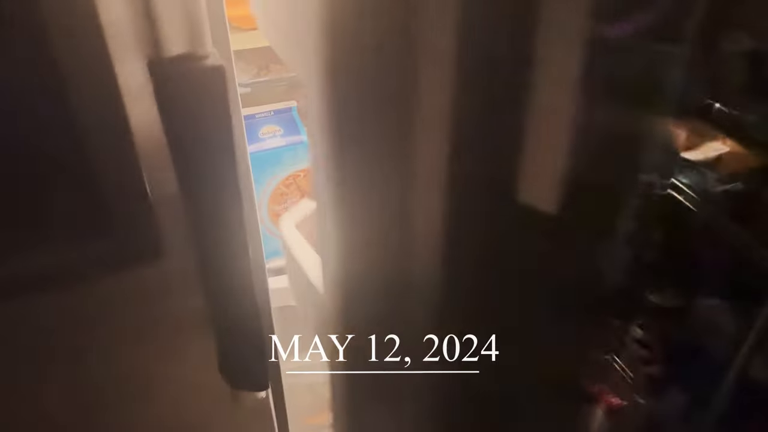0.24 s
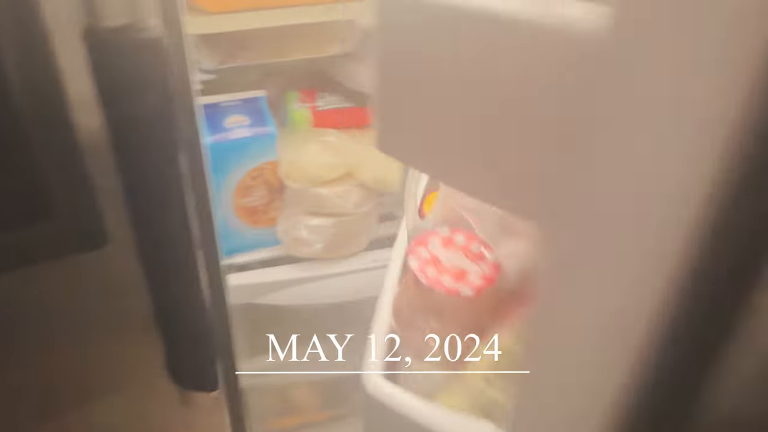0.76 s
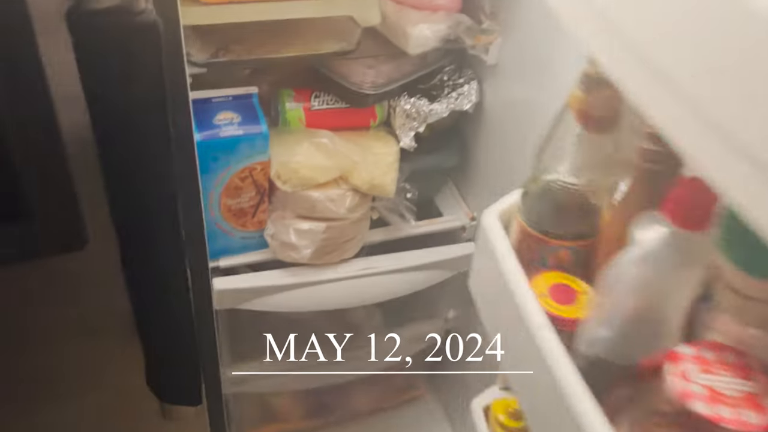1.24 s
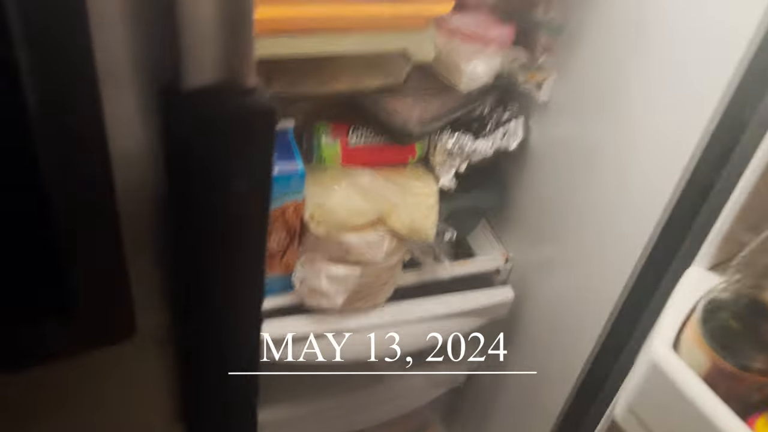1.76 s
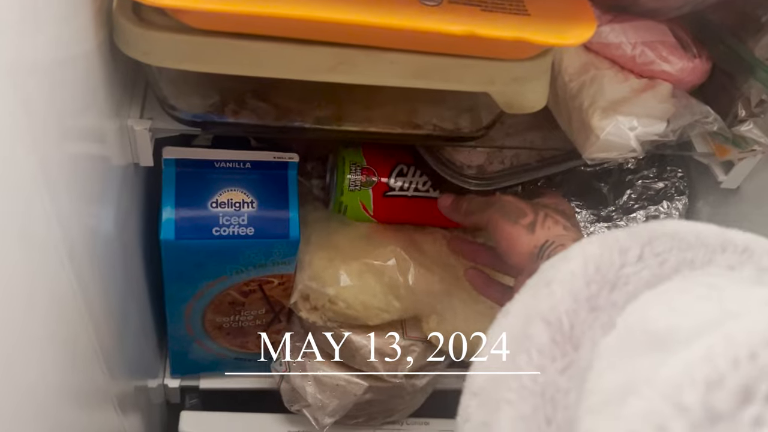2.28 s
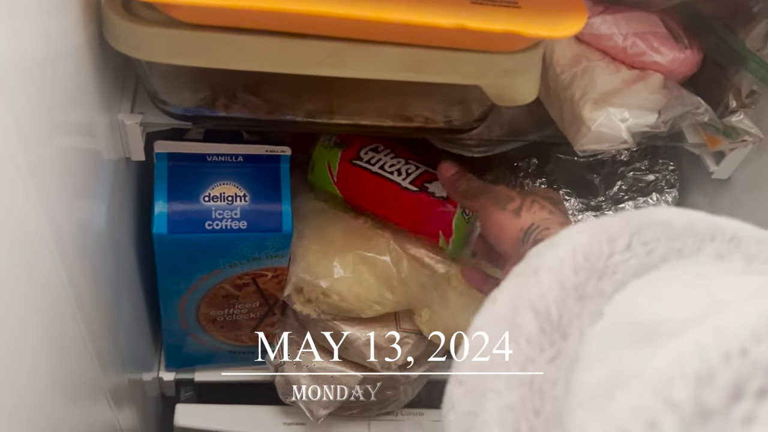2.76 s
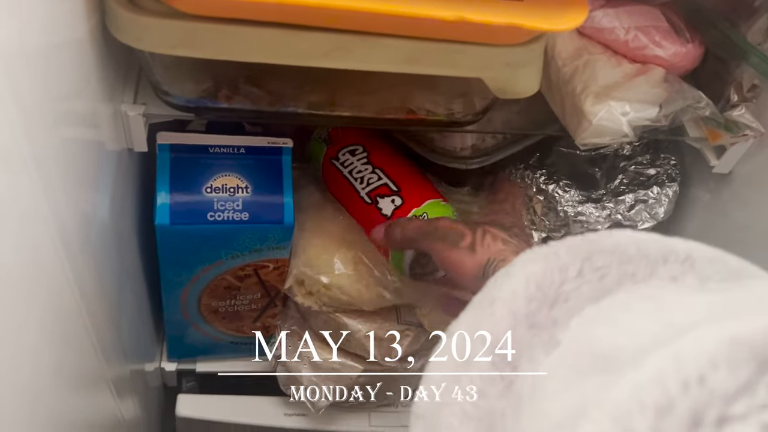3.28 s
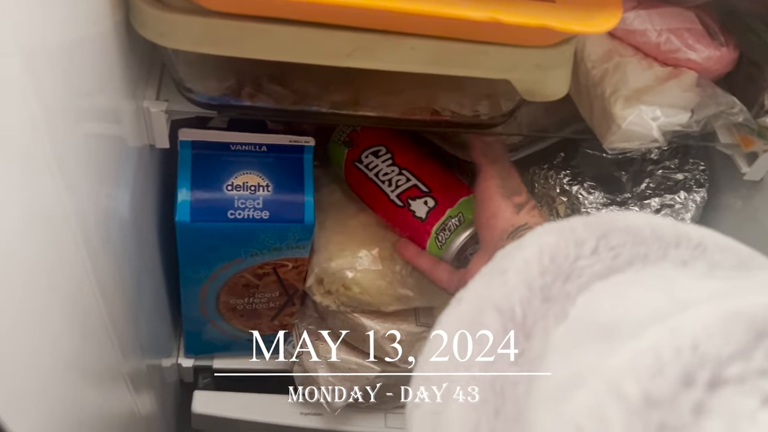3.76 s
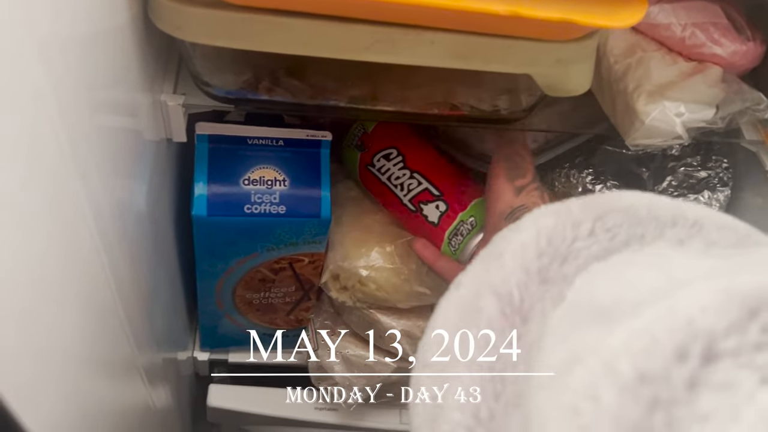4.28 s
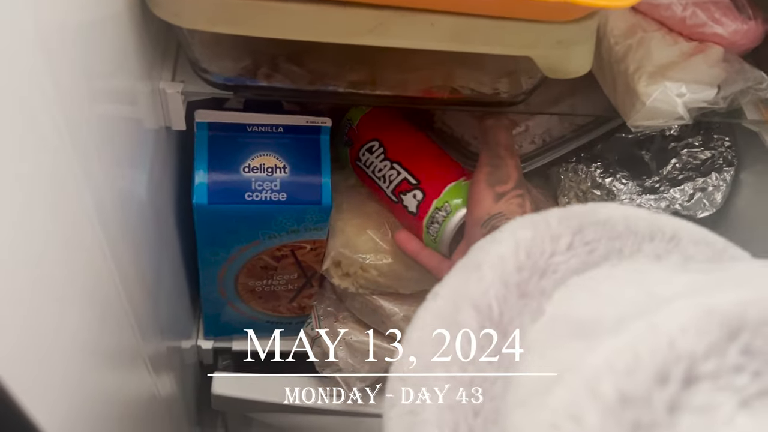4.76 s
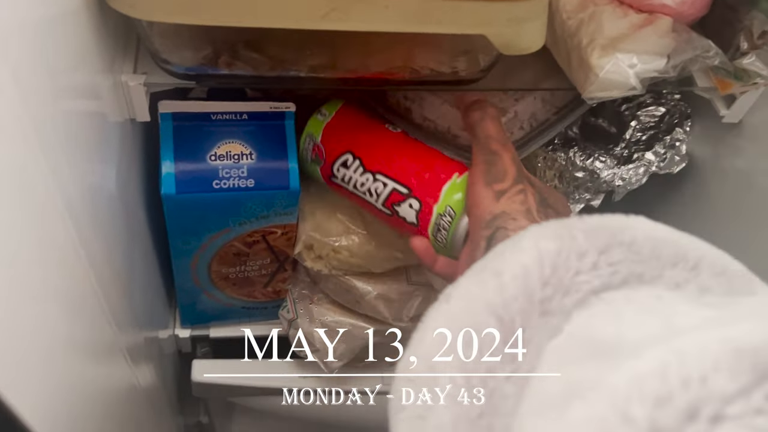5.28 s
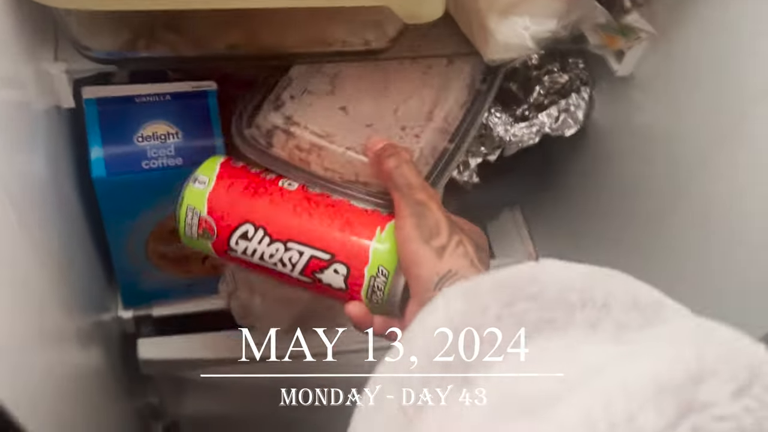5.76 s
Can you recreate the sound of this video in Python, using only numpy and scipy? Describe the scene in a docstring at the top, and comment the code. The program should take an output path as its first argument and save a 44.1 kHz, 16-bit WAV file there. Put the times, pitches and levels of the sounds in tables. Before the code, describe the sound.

Heard close up in a kitchen, a fridge door opens with soft squeaks, then hits a cabinet with a hollow knock and a brief rattle. Rummaging follows, with sharp crinkles of plastic film and foil, low rumbling and containers bumping and scraping on the shelf as a can is pulled free. A plastic tub judders forward at the end. The compressor's low hum swells and fades underneath.

```python
"""A refrigerator's compressor hums throughout. The door swings open amid faint squeaks and stepped, falling
chirps; at 1.5 s it knocks against a cabinet and rebounds, ringing its panel and rattling what the rack holds.
Then, close in, a hand pulls a can and a plastic tub from a shelf: film and foil crackle, the shelf thumps and
rumbles, and near the end the tub drags in stick-slip jerks. Two microphone ports a few centimetres apart pick
it all up."""
import sys
import numpy as np
from scipy import signal
from scipy.fft import rfft, irfft, next_fast_len
from scipy.io import wavfile
from scipy.ndimage import uniform_filter1d

SR = 44100
rng = np.random.default_rng(int(sys.argv[2]) if len(sys.argv) > 2 else 0)


def inscribe(sig):
    """Save sig as 16-bit PCM at rate SR to the path in sys.argv[1].

    A 1-D sig is mono; a 2-D sig holds one channel per row.
    Samples are clipped to [-1, 1] before scaling.
    """
    pcm = np.round(np.clip(np.atleast_2d(sig).T, -1, 1) * 32767)
    wavfile.write(sys.argv[1], SR, pcm.astype(np.int16))


N = 265834
START_S, HAND_IN_S = .054, 1.53  # the opening silence ends; the hand reaches in


def gain_of(db):
    return 10 ** (np.asarray(db) / 20)


def unit_rms(x):
    return x / np.sqrt(np.mean(x ** 2) + 1e-20)


def at_hz(points, hz):
    """Reads (Hz, value) points along a log frequency axis."""
    knots_hz, values = np.transpose(points)
    return np.interp(np.log(hz + 1), np.log(knots_hz + 1), values)


def automation(rows, column):
    """One column of a timed table, ramped from row to row."""
    rows = np.array(rows)
    return np.interp(np.arange(N) / SR, rows[:, 0], rows[:, column])


def add(mix, start_s, sound):
    part = mix[..., round(start_s * SR):][..., :sound.shape[-1]]
    part += sound[..., :part.shape[-1]]


def equalised(x, db_of_hz):
    """Filters x by a gain in dB given as a function of frequency."""
    size = next_fast_len(x.shape[-1])
    gain = gain_of(db_of_hz(np.fft.rfftfreq(size, 1 / SR)))
    return irfft(rfft(x, size) * gain, size)[..., :x.shape[-1]]


def wobble(samples):
    """Slow random drift of rms 1."""
    return unit_rms(uniform_filter1d(uniform_filter1d(rng.standard_normal(N), samples), samples))


def panned(x, pan_db):
    return x * gain_of([[pan_db / 2], [-pan_db / 2]])


# The hum's swells and fades. Each row: time in seconds, level in dB.
HUM_LEVELS = [(0.06, -52), (0.14, -48), (0.46, -53.5), (1.5, -44.5), (1.55, -30), (1.79, -52), (2.19, -38),
              (3.1, -34), (3.48, -40), (3.75, -33.5), (3.8, -51), (3.9, -34), (4.55, -62), (4.96, -36.5),
              (5.84, -35), (6.03, -42.5)]


def compressor_hum():
    """One low tone, wavering in pitch and level."""
    hz = 58.8 + 0.45 * wobble(6000)
    level_db = automation(HUM_LEVELS, column=1) + 1.5 * wobble(2500)
    return np.sqrt(2) * gain_of(level_db) * np.sin(2 * np.pi * np.cumsum(hz) / SR)


# The noise bed between strokes. Each row: time in seconds, then rustle, top treble, rumble, scrape in dB.
BED_LEVELS = [(.06, -68.5, -78, -52.5, -55), (.35, -65.5, -75, -55, -54), (.8, -72.5, -89, -53, -53),
              (1.45, -68, -81, -47, -53), (1.62, -67, -74, -50, -42), (1.85, -65.5, -76, -53, -50),
              (2.24, -68, -79, -40.5, -52.5), (2.48, -54.5, -61, -35.5, -40), (2.85, -65, -74, -44, -48.5),
              (3.3, -59.5, -63.5, -40.5, -47), (3.8, -64.5, -76, -37, -50.5),
              (4.05, -59.5, -66, -41.5, -47.5), (4.4, -57, -67, -41, -45.5), (4.75, -58.5, -65, -41.5, -45),
              (5.2, -57.5, -64.5, -36.5, -48.5), (5.55, -57.5, -69, -40.5, -43),
              (5.7, -63.5, -70, -38.5, -43), (6.03, -62.5, -66, -41, -47.5)]
# Strokes of the door, then the hand, dragging film along.
# Each row: start and length in seconds, then rustle, top treble and scrape in dB.
STROKES = [(0.08, 0.12, -78, -70, -74), (.858, 0.057, -59, -66, -75), (1.116, 0.11, -59.5, -70, -71),
           (1.284, 0.076, -53.5, -66, -71), (1.666, 0.1, -55, -65, -44.5), (1.87, 0.076, -61, -82, -63),
           (2.034, .1, -58.5, -63, -53), (2.317, 0.11, -42, -48.5, -39.5), (2.487, .13, -42.5, -52, -44),
           (2.638, 0.073, -54.5, -54, -45), (2.768, 0.041, -58.5, -65, -45), (2.874, 0.14, -56.5, -61, -45),
           (3.033, .22, -55.5, -59.5, -57), (3.413, 0.065, -50, -59, -41.5), (3.51, 0.37, -62, -69, -48.5),
           (3.827, 0.024, -56, -69, -60), (3.912, 0.029, -57, -64, -40.5),
           (4.078, 0.065, -46.5, -59, -34.5), (4.243, 0.089, -55.5, -65, -53),
           (4.425, 0.045, -46.5, -53.5, -40), (4.47, 0.18, -59, -72, -44), (4.785, .13, -54.5, -62, -40.5),
           (4.925, 0.12, -48.5, -55.5, -42.5), (5.042, 0.028, -44, -49, -32),
           (5.256, 0.25, -51.5, -55.5, -43), (5.429, 0.046, -40.5, -43, -37), (5.55, 0.035, -60, -66, -37),
           (5.598, 0.012, -44, -57, -31), (5.647, .06, -67, -68, -40.5), (5.709, 0.087, -51.5, -58, -42.5)]


def stroke_envelope(bed_column, stroke_column):
    """Gain of a layer: its resting level, plus each stroke's quick rise, sagging hold and release."""
    rise_s, sag_db_per_s, release_db_per_s = 0.009, 10, 385
    t, power = np.arange(N) / SR, gain_of(2 * automation(BED_LEVELS, bed_column))
    for row in STROKES:
        since, length = t - row[0], row[1]
        fall_db = sag_db_per_s * np.maximum(since, 0) + release_db_per_s * np.maximum(since - length, 0)
        power += np.clip(since / rise_s, 0, 1) ** 2 * gain_of(2 * (row[stroke_column] - fall_db))
    return np.sqrt(power)


# Tone of the rumble. Each row: frequency in Hz, relative level in dB.
RUMBLE_EQ = [(15, -21), (25, -26), (41, -28), (59, 1), (95, 1), (135, -20.5), (200, -13), (260, -20.5),
             (440, -120)]


def cabinet_rumble(noise):
    """The cabinet rumbles: deep noise that heaves slowly."""
    rumble = equalised(noise * gain_of(3.2 * wobble(1500)), lambda hz: at_hz(RUMBLE_EQ, hz))
    return unit_rms(rumble) * gain_of(automation(BED_LEVELS, column=3))


# Tone of the scrape. Each row: frequency in Hz, relative level in dB.
SCRAPE_EQ = [(65, 1), (110, -7), (136, 0), (231, -3), (309, -9.5), (430, -6.5), (623, -13), (914, -15.5),
             (1400, -19.5), (1490, -19.5), (1770, -25), (2430, -39), (2600, -71.5), (3380, -52),
             (5720, -120)]


def shelf_scrape(noise):
    """Dull, uneven friction on the shelf, swelling with each stroke."""
    scrape = equalised(noise * gain_of(1.02 * wobble(400)), lambda hz: at_hz(SCRAPE_EQ, hz))
    return unit_rms(scrape) * stroke_envelope(bed_column=4, stroke_column=4)


def crinkle(per_s, cycles):
    """Tiny hollows in the film pop, each ringing a few cycles at its own pitch."""
    pops = gain_of(6.4 * np.minimum(rng.exponential(1, (2, N)), 4)) * (rng.random(N) < per_s / SR)
    pitch_index, out = rng.integers(0, 24, N), np.zeros((2, N))
    for k, hz in enumerate(np.geomspace(1100, 8500, 24)):
        t = np.arange(0, 3 * cycles / hz, 1 / SR)
        ping = np.exp(-t * hz / cycles * 2) * np.sin(2 * np.pi * hz * t)
        out += signal.oaconvolve(pops * (pitch_index == k), ping[None], axes=1)[:, :N]
    return unit_rms(out)


# Tone of the film's hiss. Each row: frequency in Hz, relative level in dB.
RUSTLE_EQ = [(710, -61), (1200, -2.5), (3210, -5), (5600, -8.5), (7530, -8.5), (9890, -11.5), (11000, -3.5),
             (13000, -10), (15000, -10.5), (16400, -31)]


def film_rustle(noise):
    """Creases let go in fizzing clumps: smooth while only the door moves, grainy under the hand."""
    handled = np.arange(N) > HAND_IN_S * SR
    pops = gain_of(6.6 * np.minimum(rng.exponential(1, N), 5)) * (rng.random(N) < 250 / SR)
    fizz = unit_rms(signal.lfilter([1], [1, -np.exp(-1 / (0.0076 * SR))], pops))
    flicker = (1 + np.where(handled, 1.2, .2) * fizz) * gain_of(0.35 * wobble(900))
    hiss = equalised(noise * flicker, lambda hz: at_hz(RUSTLE_EQ, hz))
    body = equalised(hiss, lambda hz: -60. * (hz > 9900))
    grain = np.where(handled, .45, .15) * crinkle(per_s=480, cycles=8.3)
    rustle = unit_rms(unit_rms(body) + grain) * stroke_envelope(bed_column=1, stroke_column=2)
    top_treble = unit_rms(hiss - body) * stroke_envelope(bed_column=2, stroke_column=3)
    return rustle + top_treble


# Faint squeaks, stepped falling chirps and airy bands during the opening seconds. # Each row: start in seconds,
# first and last pitch in Hz, level in dB, length in seconds, width in Hz.
SQUEAKS = [(0.063, 2800, 2800, -79, 0.29, 160), (0.522, 4070, 3970, -70, 0.025, 200),
           (0.536, 3560, 3440, -70, 0.048, 350), (0.573, 3070, 2550, -64.5, 0.027, 200),
           (0.761, 4300, 4560, -76, 0.045, 300), (0.772, 3840, 4070, -79, 0.058, 250),
           (0.805, 3230, 3120, -71, 0.044, 300), (0.826, 2950, 2560, -71, 0.039, 256),
           (0.925, 3510, 2950, -71, 0.14, 600), (1.032, 3800, 3500, -74.5, 0.11, 250),
           (0.077, 7300, 7050, -84, 0.12, 900), (.07, 1532, 1538, -76, 0.85, 80),
           (0.304, 4610, 4820, -81, 0.31, 1100), (0.306, 6580, 6270, -87, 0.66, 900),
           (0.998, 6050, 4970, -82, 0.1, 250), (1.1, 4650, 4540, -72, 0.12, 910),
           (1.749, 3650, 3610, -63, 0.0257, 200), (1.777, 2990, 2870, -60.5, 0.024, 200),
           (1.97, 2050, 1965, -73, 0.042, 150)]


def gliding_squeaks():
    """Rough gliding tones whose level and phase wander, each with a short tail."""
    out = np.zeros(N)
    for start, from_hz, to_hz, db, length, width_hz in SQUEAKS:
        t = np.arange(0, min(length + 0.25, 1), 1 / SR)
        noise = rng.standard_normal(SR) + 1j * rng.standard_normal(SR)
        lowpass = [1, -np.exp(-np.pi * width_hz / SR)]
        wander = signal.lfilter([1], lowpass, signal.lfilter([1], lowpass, noise))[-len(t):]
        glide_hz = np.interp(t, [0, length], [from_hz, to_hz])
        tone = unit_rms((wander * np.exp(2j * np.pi * np.cumsum(glide_hz) / SR)).real)
        fall_db = (t > length) * (23 + 380 * (t - length))
        add(out, start, gain_of(db - fall_db) * np.minimum(t / 0.011, 1) * tone)
    return out


# A tub drags over the shelf. Each row: start in seconds, level in dB, pitch in Hz.
SLIPS = [(5.554, -27.5, 750), (5.612, -22, 770), (5.632, -27.5, 746), (5.655, -28, 746), (5.662, -33, 745),
         (5.678, -33, 744), (5.712, -23, 740)]


def tub_slips():
    """Each stick-slip jerk is a single dead swing with almost no ring."""
    out, t = np.zeros(N), np.arange(400) / SR
    for start, db, hz in SLIPS:
        add(out, start, -gain_of(db) * np.sin(2 * np.pi * hz * t) * np.exp(-t * hz * 0.98))
    return out


def ring(modes):
    """A struck body: a sum of dying modes, neighbours in opposite polarity."""
    t = np.arange(SR // 2) / SR
    hz, db, t60 = np.transpose(modes)[:, :, None]
    polarity = (-1) ** np.arange(len(modes))[:, None]
    return (polarity * gain_of(db - 60 * t / t60) * np.sin(2 * np.pi * hz * t)).sum(0)


def knock(body, hz, contact_ms, rough, ringing):
    """A juddering contact is heard directly and drives the body's modes near its own rate."""
    t = np.arange(0, np.clip(contact_ms, 1.5, 99) / 1000, 1 / SR)
    pressure = np.hanning(len(t))
    judder = pressure * np.sin(2 * np.pi * hz * t)
    pole = np.exp(-2 * np.pi * 1.33 * hz / SR)  # slow contacts are dull
    grit = unit_rms(signal.lfilter([1], [1, -pole], rng.standard_normal(4410)))
    rung = signal.fftconvolve(body, judder + rough * pressure * grit[:len(t)])
    sound = ringing * rung / abs(rung).max()
    add(sound, 0, judder)
    return sound


# Resonances of shelf and tubs. Each row: frequency in Hz, relative level in dB, T60 in seconds.
SHELF_MODES = [(95, 10.5, 0.3), (167, 1, 0.41), (200, -11, 0.12), (270, -2, 0.064), (350, 3, 0.14),
               (448, 8, 0.4), (520, 33.5, 0.0067), (593, 1, 0.15), (808, 30.5, 0.024), (1170, 15, 0.055),
               (1510, 22, 0.046), (1820, 11, .04)]
# Bumps on the shelf. Each row: start in seconds, level in dB, judder in Hz,
# contact time in ms (capped at 99), left minus right in dB.
THUMPS = [(0.077, -45, 212, 71, 0), (0.2, -46.5, 215, 64, -3), (0.441, -51.5, 204, 120, -4),
          (1.89, -40.5, 153, 22, -3), (2.052, -41.5, 425, 19.5, 3), (2.308, -43, 440, 8.4, 7),
          (2.411, -14.5, 270, 12.3, 2), (2.41, -27, 1430, 6, -1), (2.415, -25.5, 430, 11.7, 3),
          (2.427, -21.5, 158, 24.5, -1), (2.508, -24.5, 212, 13, 1), (2.535, -25, 170, 22, -1),
          (2.538, -18, 1550, 10.4, -5), (2.649, -39.5, 460, 20, 5), (2.94, -36.5, 161, 39, 4),
          (2.95, -44.5, 430, 44, 6), (3.15, -41.5, 436, 25, 3), (3.154, -39, 190, 33, 0),
          (3.14, -32, 82.6, 34, 7), (3.376, -36.5, 484, 8.2, 1), (3.386, -30, 95, 38, 2),
          (3.47, -34, 86, 70, 0), (3.57, -28, 90, 51, -2), (3.7, -31.5, 82.1, 70, 0),
          (3.879, -32, 95, 38, 0), (3.949, -42, 84, 61, -4), (3.43, -40, 438, 24, -2),
          (3.545, -41, 241, 22, -3), (3.842, -35.5, 154, 30, 3), (3.925, -33, 484, 9.2, 4),
          (4.082, -34, 403, 13, 2), (4.116, -31.5, 600, 23, 6), (4.121, -35.5, 190, 30, -4),
          (4.144, -33, 780, 9.3, -6), (4.155, -34.5, 466, 30, 3), (4.245, -39, 430, 15, 6),
          (4.273, -37.5, 450, 11.5, 7), (4.719, -36.5, 930, 7.5, 3), (4.789, -39, 430, 23, 3),
          (4.812, -43, 447, 30, 7), (4.844, -34, 450, 14, 4), (4.869, -43, 457, 9.7, 10),
          (4.975, -40, 211, 29, -2), (5.055, -30.5, 520, 12.7, 7), (4.978, -33.5, 113, 48, 0),
          (5.058, -28, 866, 7.6, 10), (5.065, -27, 225, 17.5, -3), (5.09, -28.5, 90, 38, 2),
          (5.225, -30.5, 378.7, 11.2, 4), (5.439, -30.5, 372.4, 9.8, 3), (5.482, -31, 184, 17, -3),
          (5.553, -47, 755, 16, -8), (5.782, -29, 443, 14, -4), (5.863, -36, 328, 9.8, -9),
          (5.877, -38, 392, 6, -9)]


def shelf_thumps():
    """Tubs and the can bump the shelf and set it ringing."""
    out, shelf = np.zeros((2, N)), ring(SHELF_MODES)
    for start, db, hz, contact_ms, pan_db in THUMPS:
        thump = knock(shelf, hz, contact_ms, rough=0.51, ringing=0.51)
        add(out, start, panned(gain_of(db) * thump, pan_db))
    return out


# Snaps of film, foil and lids. Each row: start in seconds, then level, low EQ trim, high EQ trim
# and left minus right, all in dB.
SNAPS = [(0.8609, -34.5, -31, -15, 0.5), (1.2994, -50, -15, -11, 2.5), (1.3164, -38, -27, -26, 2.0),
         (1.5294, -25.5, 11.5, -36, 0.5), (1.5499, -16.5, -15, -12, 0.0), (1.5745, -26, -2, -14, 2),
         (1.6836, -38, -1, -25, 1), (1.7315, -43.5, 3, -6, 1.0), (1.7574, -47, -9, -18, -2),
         (1.8796, -42.5, -3, -14, 1.5), (1.9225, -40.5, -11, -12, 1.0), (2.0492, -44.5, -8, -24, 2.0),
         (2.0847, -42, -23, -14, 1.5), (2.1086, -38.5, -9, -16, 1), (2.164, -43.5, -21, -6, 0.0),
         (2.2498, -36, -20, -8.5, 0.5), (2.2762, -48, 3, -27, 2), (2.2937, -31, -13.5, -15, 0.0),
         (2.3226, -28, -7, -11, 0), (2.3665, -24.5, -18, -9, 1.0), (2.3845, -25, -18, -7, 2),
         (2.4064, -22.5, -4.5, -10, 1.5), (2.4294, -20, -15, -19, 0.5), (2.4967, -33, -15, -10, 1.0),
         (2.5047, -24, -10, -8, 2), (2.5274, -14.5, -13, -13, 4), (2.5351, -6.5, -13, -14, -1),
         (2.5416, -13.5, -10.5, -18, 1.5), (2.5601, -23, -23, -10, 3), (2.583, -22, -8.5, -11, -5),
         (2.5884, -22, -12, -9, 3), (2.6085, -27, -7, -11, 3), (2.6174, -27, -15, -13, -1),
         (2.6798, -27, -26, -21, 0.5), (2.7067, -32, -21, -10.5, 0.5), (2.7866, -40, -17, -14, 1.0),
         (2.8125, -32.5, -24, -17, 1.5), (2.8729, -31, -29, -13, 1.0), (2.9254, -38, -17, -17, 1.0),
         (2.9816, -40, -8, -19, 0), (3.042, -45, -1, -16, -1.0), (3.0654, -37, -0.5, -12, 2),
         (3.0924, -40, -26, -12, 0.5), (3.1418, -32.5, -9, -18, 1.5), (3.1812, -40, -8.5, -18, 1.0),
         (3.251, -37.5, -9, -26, 2.0), (3.4196, -39, -15, -8, -1), (3.4316, -32, -4, -19, 1),
         (3.4466, -27, -16, -17, 1.5), (3.467, -27, -14, -16, 1), (3.5623, -38, -6, -18, 0),
         (3.6112, -40.5, -0.5, -22, 1.0), (3.7948, -26.5, -23, -8, 0), (3.8362, -32.5, -11, -27, 2),
         (3.8761, -39.5, -5, -7, 0), (3.9115, -43, -17, -16, -1), (3.9434, -31.5, -12, -17, 0),
         (4.0811, -43, -1.5, -16, 2.0), (4.1026, -21.5, -18, -21, 1.5), (4.1275, -26, -7, -19, -2),
         (4.2343, -30.5, -30, -23, 1.5), (4.2857, -41.5, -9, -7, -1), (4.351, -42.5, 1, -27, 0),
         (4.3949, -37, -7, -23, 4), (4.4418, -32.5, -0.5, -23, 2), (4.5106, -39.5, -12, -8, 0),
         (4.5471, -32.5, -19, -9.5, 3), (4.7187, -27, -16.5, -27, 2), (4.7576, -41, -10, -12, 1.0),
         (4.8249, -29.5, -19, -25, 0.5), (4.9207, -30, -23, -22, 2.0), (4.9514, -36.5, -4, -24, 1.5),
         (4.9916, -41, -18, -15, -1), (5.0444, -32, -14, -12, 2.0), (5.0589, -27, -3.5, -10.5, -2),
         (5.2435, -37.5, -28, -5, 2), (5.2949, -34, -32, -17, 0.5), (5.3143, -32.5, -20, -17, 6),
         (5.3564, -38, -17, -16, 1.0), (5.4395, -17.5, -16, -21, 0.5), (5.4461, -22, -12, -17, 0),
         (5.6087, -20.5, -13.5, -20, -1), (5.7299, -37, -6, -8, 1.0), (5.7853, -31, -5, -22, 1)]


def crease_snaps():
    """Sharp noise bursts with a short fizzing tail; every crease has its own hollow colour."""
    rise_s, lead_s = 0.0006, .008  # the lead leaves room for the EQ to ring ahead of the snap
    out, t = np.zeros((2, N)), np.maximum(np.arange(4096) / SR - lead_s, 0)
    decay = sum(gain_of(db - 60 * t / t60) for db, t60 in [(-9.5, 0.0049), (-7.5, 0.029), (-23.5, 0.08)])
    envelope = decay * np.minimum(t / rise_s, 1)
    for start, db, low_db, high_db, pan_db in SNAPS:
        burst = rng.standard_normal(len(t)) * envelope
        tone = [(500, 15.5 + low_db), (1200, 15.5 + low_db), (1800, 17.5 + low_db),
                (2500, 3 + low_db / 2), (4500, -2), (7500, 1.5),
                (12500, high_db + 12.5), (15000, high_db + 8), (16400, high_db - 17)]
        hollow = np.transpose([np.geomspace(600, 16000, 16), 4.3 * rng.standard_normal(16)])
        snap = equalised(burst, lambda hz: at_hz(tone, hz) + at_hz(hollow, hz))
        add(out, start - lead_s, panned(gain_of(db) * snap, pan_db))
    return out


# Resonances of the door panel. Each row: frequency in Hz, relative level in dB, T60 in seconds.
DOOR_MODES = [(90, -26, 0.64), (116.9, 2, 0.47), (150, -3.5, 0.29), (193, -24, 0.25), (225, -3, 0.2),
              (300, 3.5, 0.25), (336, 8, 0.09), (430, -17, 0.2), (462, -19, 0.15), (600, -10, 0.24),
              (650, -12, 0.16), (834, -25, 0.18), (940, -22, 0.35), (1100, -8, .12), (1420, -17, .2),
              (1690, -10, 0.17)]
# The door's hit and rebounds.
# Each row: start in seconds, level in dB, judder in Hz, contact time in ms, rack rattle in dB.
DOOR_BLOWS = [(1.528, -21, 886, 5.6, -16.5), (1.531, 0, 193, 18.4, -24.5), (1.533, -17, 1170, 10, -40),
              (1.534, -8, 472, 14.3, -44), (1.534, -18, 84, 53, -47), (1.551, -9, 319, 8.7, -33),
              (1.572, -12.5, 163, 11.6, -53), (1.595, -27, 162.2, 8.3, -55), (1.625, -23.5, 135, 18, -46),
              (1.739, -27.5, 212, 17, -44.5)]


def door_knock():
    """The door strikes the cabinet, and each blow rings its panel."""
    out, panel = np.zeros(N), ring(DOOR_MODES)
    for start, db, hz, contact_ms, _ in DOOR_BLOWS:
        add(out, start, gain_of(db) * knock(panel, hz, contact_ms, rough=0.39, ringing=0.15))
    return out


# Tone of the rattle. Each row: frequency in Hz, relative level in dB.
RATTLE_EQ = [(240, -6.5), (400, -0.5), (678, -10), (2460, -24.5), (3150, -29.5), (7890, -38), (9950, -43),
             (12200, -39), (15100, -46), (16400, -90)]
# Decay of the rattle. Each row: frequency in Hz, T60 in seconds.
RATTLE_DECAY = [(400, 0.19), (2000, 0.26), (6000, 0.28), (14000, 0.29)]


def rack_rattle():
    """Each blow of the door shakes what the rack holds: noise that dies away band by band."""
    out, t = np.zeros((2, N)), np.arange(SR // 2) / SR
    for start, *_, rattle_db in DOOR_BLOWS:
        hz, frame_s, bands = signal.stft(rng.standard_normal((2, len(t))), SR, nperseg=256)
        bands *= gain_of(at_hz(RATTLE_EQ, hz)[:, None] - 60 * frame_s / at_hz(RATTLE_DECAY, hz)[:, None])
        rattle = signal.istft(bands, SR, nperseg=256)[1][:, :len(t)]
        attack = np.minimum(t / 0.0038, 1)
        add(out, start, gain_of(rattle_db) * attack * rattle / rattle[:, :800].std())
    return out


def wall_echoes(x, level_db, t60):
    """Hard walls add a spray of echoes, different at each port."""
    t = np.arange(SR // 3) / SR
    taps = rng.standard_normal((2, len(t))) * gain_of(-60 * t / t60) * (t > .002)
    return x + gain_of(level_db) * signal.fftconvolve(x, taps / np.linalg.norm(taps[0]), axes=1)[:, :N]


# Phase between the ports. Each row: frequency in Hz, lead of the left port in radians.
PORT_PHASE = [(60, 0.48), (520, -0.48), (1030, -1), (1500, -2), (1780, -1), (2930, 1), (4500, 0.33),
              (5500, -1.6), (6400, -1.5), (7300, 0.56), (9600, -3), (12100, -5), (13700, -6.5), (15200, -9),
              (16100, -9.4)]
# How alike diffuse sound is at the ports. Each row: frequency in Hz, coherence from 0 to 1.
PORT_COHERENCE = [(60, 0.85), (250, 0.91), (700, 0.28), (1500, 0.25), (4000, 0.72), (14000, 1)]
# Stereo balance. Each row: frequency in Hz, left minus right in dB.
PORT_BALANCE = [(60, -1.5), (130, -0.5), (290, 2), (640, 1.5), (1410, -0.5), (3100, 3.5), (6820, 0.5),
                (15000, -1)]


def microphone_ports(diffuse, near):
    """Two unrelated diffuse channels partly blend; all sound differs in phase and level between ports."""
    size = next_fast_len(N)
    hz = np.fft.rfftfreq(size, 1 / SR)
    coherence = np.clip(at_hz(PORT_COHERENCE, hz), 0, 1)
    left, unrelated = rfft(diffuse, size)
    right = coherence * left + np.sqrt(1 - coherence ** 2) * unrelated
    spectra = np.array([left, right]) + rfft(near, size)
    left_gain = np.exp(.5j * at_hz(PORT_PHASE, hz)) * gain_of(at_hz(PORT_BALANCE, hz) / 2)
    return irfft(spectra * [left_gain, 1 / left_gain], size)[:, :N]


def scene():
    """Near sources and diffuse noise layers meet at the two ports."""
    handling = wall_echoes(shelf_thumps() + crease_snaps() + tub_slips(), level_db=-11.5, t60=0.11)
    squeaks = wall_echoes(gliding_squeaks()[None], level_db=2.5, t60=0.3)
    near = handling + squeaks + compressor_hum() + door_knock()
    noise = rng.standard_normal((3, 2, N))
    diffuse = cabinet_rumble(noise[0]) + shelf_scrape(noise[1]) + film_rustle(noise[2]) + rack_rattle()
    return microphone_ports(diffuse, near) * (np.arange(N) > START_S * SR)


def record(dry):
    """The microphone drops the deepest bass and top treble, saturates and is band-limited."""
    ceiling, edge_hz = .95, 16400
    heard = signal.sosfilt(signal.butter(2, 45, "high", fs=SR, output="sos"), dry)
    heard = equalised(heard, lambda hz: at_hz([(15000, 0), (15600, -15), (16400, -8)], hz))
    heard = ceiling * np.tanh(heard / ceiling)  # the input stage saturates softly on the door knock
    lowpass = signal.firwin(1023, edge_hz, window=("kaiser", 9), fs=SR)
    return signal.oaconvolve(heard, lowpass[None], "same")


dry = scene()
out = record(dry)
inscribe(out)
```